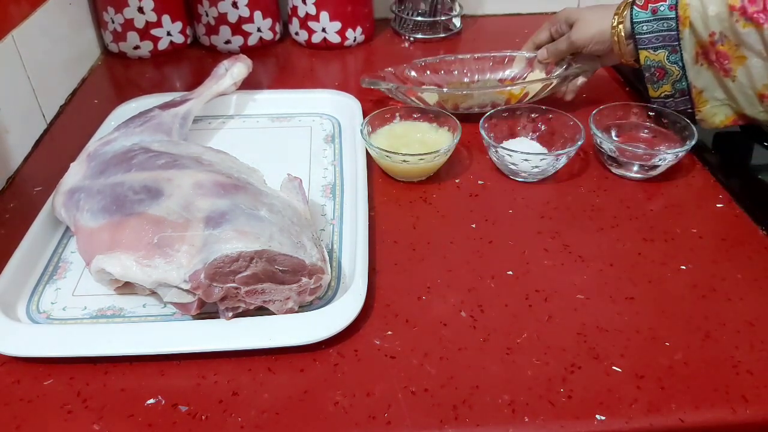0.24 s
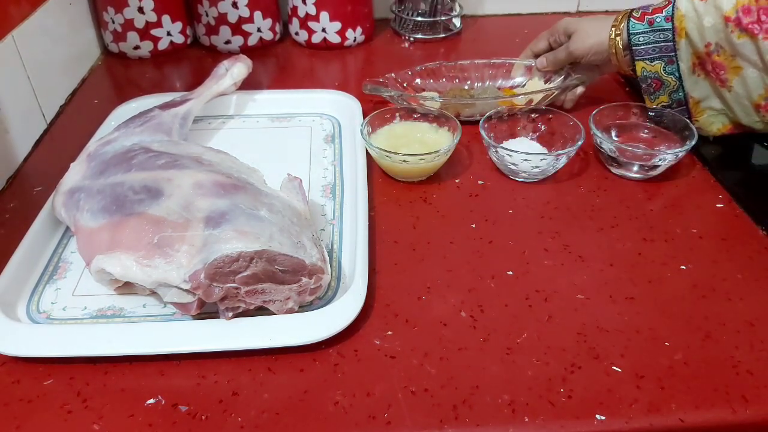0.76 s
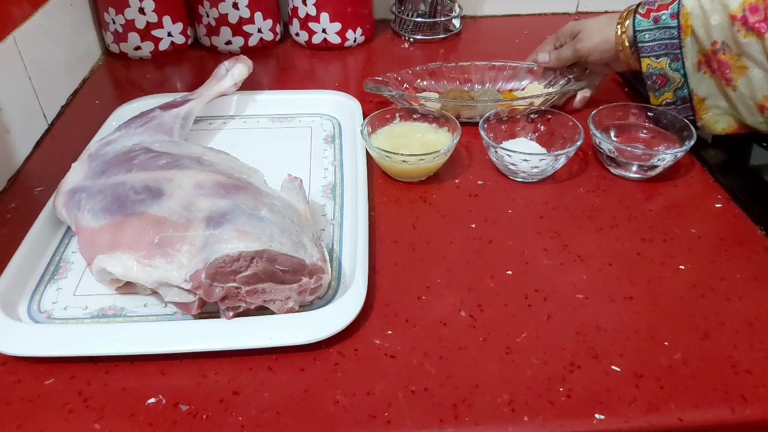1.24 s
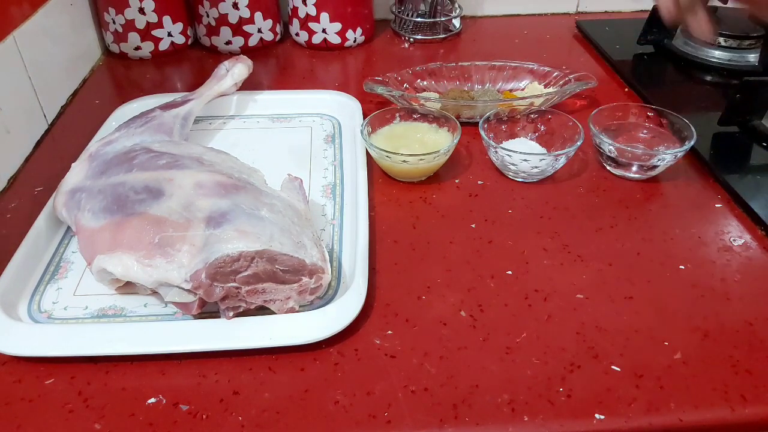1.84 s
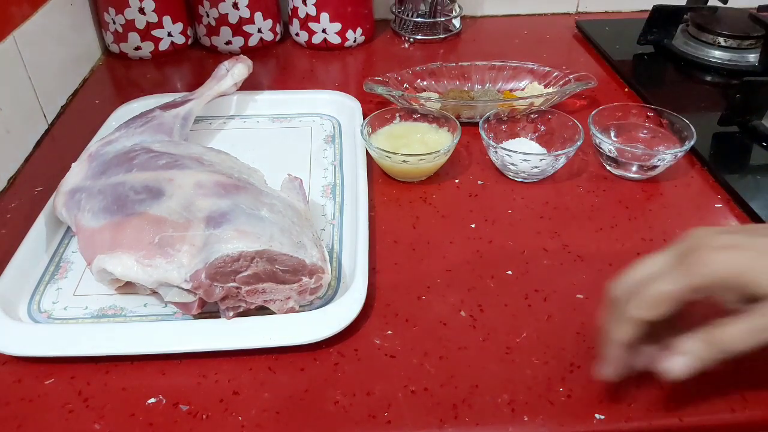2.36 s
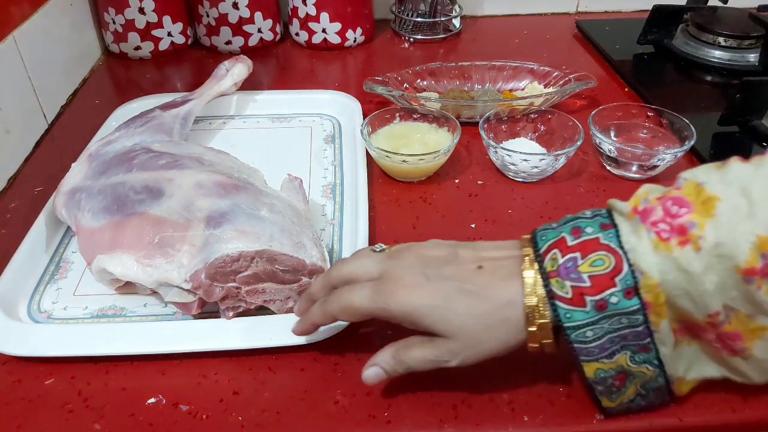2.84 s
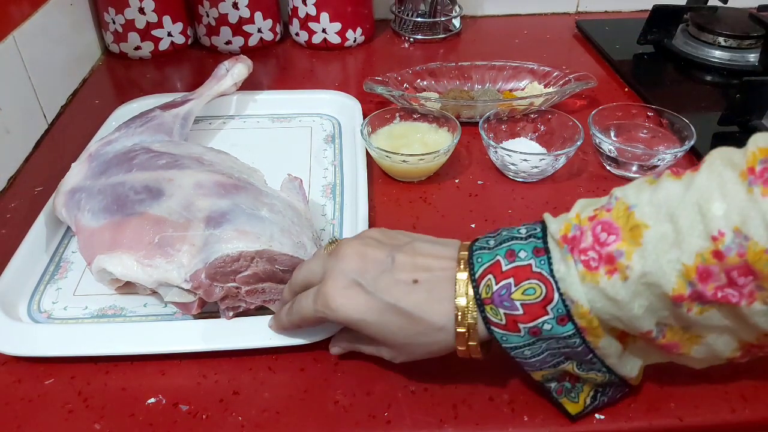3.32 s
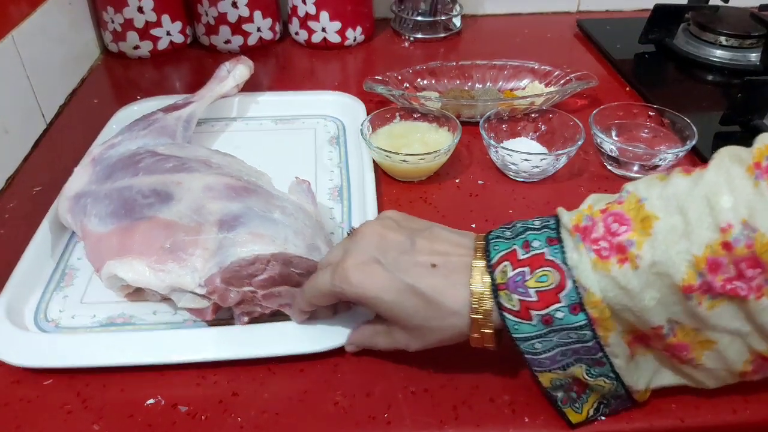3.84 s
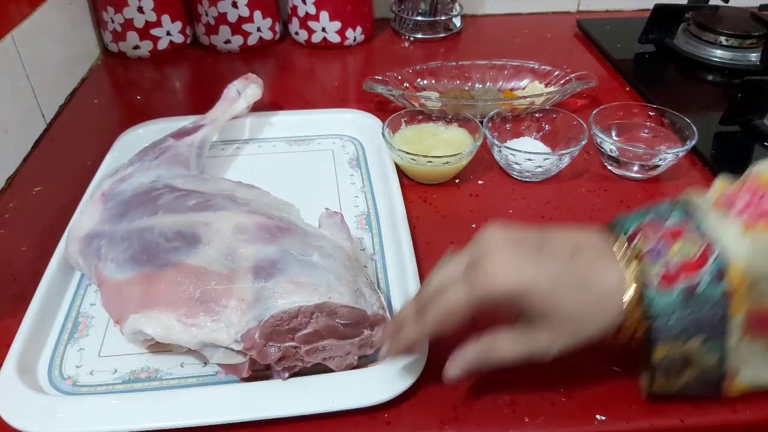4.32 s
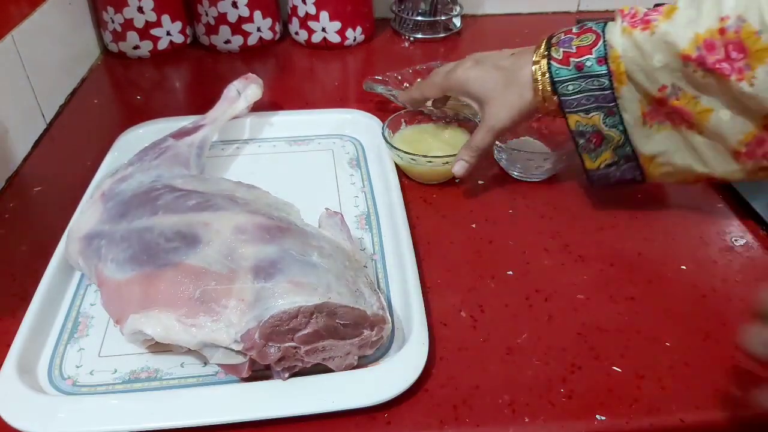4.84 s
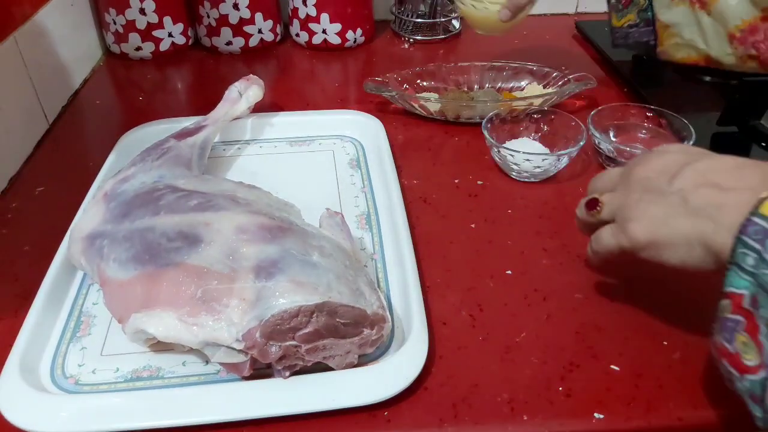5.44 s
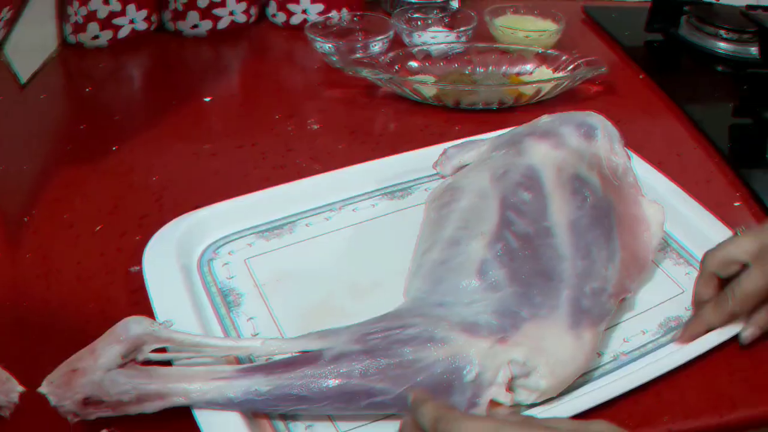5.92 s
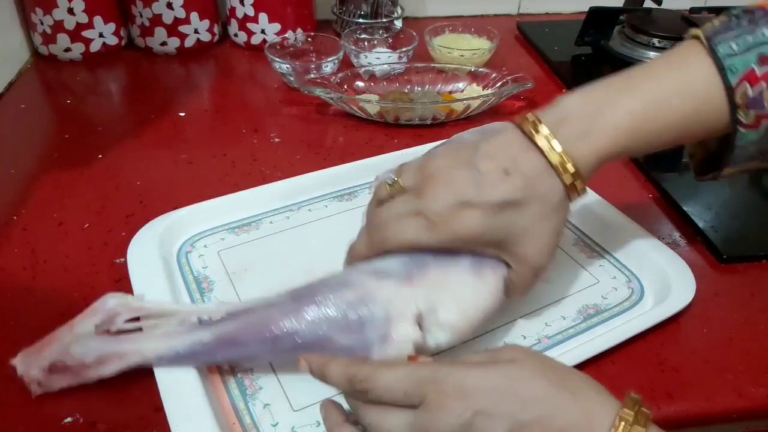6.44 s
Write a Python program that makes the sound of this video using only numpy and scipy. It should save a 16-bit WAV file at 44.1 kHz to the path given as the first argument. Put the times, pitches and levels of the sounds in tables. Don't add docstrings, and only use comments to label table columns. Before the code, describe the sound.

Sharp glass clinks in a tiled kitchen, a pause with low hum, then a clattering tray drag and faint handling of wet meat.

```python
import sys
import numpy as np
from scipy import signal
from scipy.fft import rfft, irfft, next_fast_len
from scipy.io import wavfile
from scipy.ndimage import uniform_filter1d

SR = 44100
rng = np.random.default_rng(int(sys.argv[2]) if len(sys.argv) > 2 else 0)


def store_wav(level_fs):
    pcm = np.round(np.clip(np.atleast_2d(level_fs), -1, 1) * 32767)
    wavfile.write(sys.argv[1], SR, pcm.T.astype(np.int16))


def ratio_of_db(decibels):
    return 10 ** (np.asarray(decibels, float) / 20)


N = 293926

# (frequency [Hz], level [dB], time to fall 60 dB [s])
RIM = [(3100, -18, 0.076), (4380, -25, 0.016), (5300, -28, 0.048), (6620, -21, 0.045), (8400, -50, 0.028)]
# (frequency [Hz], level [dB per Hz])
DISH_CRACK = [(300, -0.5), (1200, 1), (2700, -9.5), (3300, -18.5), (3850, -31.5), (4450, -17.5),
              (6600, -24), (7300, -38), (8500, -25.5), (11000, -29), (13500, -48)]
# (frequency [Hz], level [dB], time to fall 60 dB [s])
TRAY = [(412, -8.5, 0.037), (588, -8, 0.038), (916, -0.5, 0.055), (1010, -4, 0.041), (1130, -1.5, 0.029),
        (1173, -4.5, 0.022), (1550, -2, 0.052), (1940, -15, 0.035), (2170, -8.5, 0.027),
        (2820, -0.5, 0.034), (3350, -6, 0.01), (4100, -17, 0.0089), (4660, -29, 0.02), (5860, -17.5, 0.015)]


def dish_landing():
    # (time [s], peak [dB], strongest pitch [Hz], treble [dB], freedom to ring [factor])
    hits = [(.8411, -14, 1680, 4, 0.26), (.8432, -13.5, 1410, -3.5, 0.77), (.8472, -20, 2000, -8, 0.78),
            (.8625, -21, 1700, 1, 0.46), (.876, -23, 1500, 2, 0.52), (.9636, -28, 1500, 12, 0.2),
            (.9661, -7.5, 1920, -5.5, 0.72), (.9875, -21.5, 900, -4, 0.67), (1.0005, -19.5, 1870, 2, 0.38),
            (1.028, -25, 1400, -6, 0.81), (1.057, -30, 1700, 2.5, 0.43)]
    # (frequency [Hz], level [dB], time to fall 60 dB [s])
    body = [(567, -8, 0.074), (710, -1, 0.037), (903, -3, 0.041), (1054, -1, 0.022), (1324, -0.5, 0.044),
            (1412, 3.5, 0.057), (1640, -4, 0.033), (1733, 1.5, 0.053), (1910, 0, 0.047), (2040, -7, 0.068),
            (2170, -7, 0.03), (2386, 0.5, 0.044), (2600, -11.5, 0.018), (2740, -8.5, 0.023)]
    return blows(hits, np.vstack([body, RIM]), DISH_CRACK, ring_db=-2.5, crack_db=-5.0, thump_db=-14.5,
                 focus_db=3.0, pan_db=3.5, rock_db=-10.5)


def dish_settling():
    # (time [s], peak [dB], strongest pitch [Hz], treble [dB], freedom to ring [factor])
    hits = [
        (1.3705, -26.5, 895, -20, 0.72),
        (1.3935, -21, 1650, 2, 1),
        (1.3975, -17.5, 1440, -4.5, 0.97),
        (1.418, -32, 1610, -8, 0.66),
        (1.452, -30, 1650, -3, 1),
    ]
    # (frequency [Hz], level [dB], time to fall 60 dB [s])
    flat = [(590, -28, .08), (724, 3, 0.037), (1000, -19, 0.032), (1297, -1.5, 0.055), (1360, -3, 0.065),
            (1410, -15, .08), (1537, -4, 0.061), (1590, -3, 0.053), (1710, -5, 0.05), (1945, -8, 0.051),
            (2240, -8.5, .06), (2440, -9, .07)]
    return blows(hits, np.vstack([flat, RIM]), DISH_CRACK, ring_db=-1.1, crack_db=-0.5, thump_db=-18.0,
                 focus_db=12.0, pan_db=-2.5, rock_db=3.0)


def tray_bumps():
    # (time [s], peak [dB], strongest pitch [Hz], treble [dB], freedom to ring [factor])
    hits = [(4.3065, -20.5, 2600, 7, 0.89), (4.3095, -11.5, 1360, 5.5, 0.62),
            (4.3145, -10.5, 1480, -15, 0.68), (4.322, -15.5, 1590, -8.5, 0.59),
            (4.343, -31, 1500, -9, 0.39), (4.349, -27.5, 1150, -6, 0.25), (4.356, -22.5, 1150, -8, .4),
            (4.367, -24, 1000, -8.5, 0.71), (4.386, -19, 990, -5.5, 0.22), (4.414, -23.5, 1010, -8, 0.49),
            (4.436, -21, 830, -4.5, 0.97), (4.4445, -21, 830, -11, 0.45), (4.454, -17, 1100, -11, .4),
            (4.483, -15, 920, -20.5, 0.3), (4.505, -12, 1970, -4.5, 0.42), (4.5125, -14.5, 1840, -8, 0.64),
            (4.518, -15.5, 1547, -4.5, 0.59), (4.604, -27.5, 1790, -12, 0.21),
            (5.453, -46, 1260, -9.5, 0.72), (5.495, -43, 890, -19, 0.71)]
    # (frequency [Hz], level [dB per Hz])
    colour = [(300, 8.5), (1200, -1.5), (2300, -3.5), (3300, -5.5), (4100, -10), (4700, -18), (6200, -14),
              (7000, -27.5), (10000, -22.5), (13500, -28.5)]
    return blows(hits, TRAY, colour, ring_db=-3.0, crack_db=-4.0, thump_db=-25.0,
                 focus_db=28.5, pan_db=-6.0, rock_db=3.5)


def tray_drag():
    # (time [s], level [dB])
    scrape = [(4.17, -72), (4.22, -57), (4.28, -45), (4.36, -40), (4.44, -37), (4.52, -40.5), (4.57, -43.5),
              (4.62, -68), (4.66, -92)]
    # (frequency [Hz], level [dB per Hz])
    rub = [(1470, -10), (2500, -1.5), (3400, -4.5), (3950, -1.5), (4500, 0.5), (5000, -1.5), (6210, -7),
           (7150, -6), (11500, -13), (12700, -18), (13500, -30)]
    grits_per_s, kinds = 500, 6
    span = 4 * SR, 5 * SR
    rattle = np.zeros(SR)
    for _ in range(kinds):
        lands = rng.random(SR) < grits_per_s / kinds / SR
        grit = lands * ratio_of_db(1.6 * np.minimum(rng.exponential(1, SR), 4))
        tick = ring(TRAY, 730, 2.0, focus_db=2.0, free=0.2, split=0.16)
        rattle += signal.oaconvolve(grit, tick)[:SR]
    rattle = np.pad(evened(rattle), (span[0], N - span[1]))
    grains = ratio_of_db(1.1 * evened(uniform_filter1d(rng.standard_normal(N), size=90)))
    scrape_db = curve(scrape)
    rattle_gain = ratio_of_db(0.87 * scrape_db - 5)
    return rattle_gain * rattle + ratio_of_db(scrape_db + 0.5) * grains * noise(rub, 4.0, size=256, span=span)


def bowl_knocks():
    # (time [s], peak [dB], strongest pitch [Hz], treble [dB], freedom to ring [factor])
    hits = [
        (4.4762, -6.5, 2650, 7, 0.39),
        (4.4812, -12, 2520, -0.5, 0.7),
        (4.4915, -12, 2420, 0, 1),
        (4.4995, -25.5, 2490, 19, 0.95),
        (4.5185, -47, 2500, 17, .7),
        (4.5545, -21, 2420, -7.5, 0.79),
        (4.5570, -18, 2420, -5, 0.47),
        (4.5610, -24.5, 2420, -9, 0.35),
    ]
    # (frequency [Hz], level [dB], time to fall 60 dB [s])
    body = [(2430, 9, 0.066), (2690, 11.5, 0.021), (3208, -2.5, 0.017), (4970, 0, 0.024),
            (5500, -0.5, 0.017), (5830, 0, .02), (8000, -9.5, 0.21), (7940, -12, .08), (8457, -11, 0.1),
            (9180, -8, .03), (8730, -11.5, 0.05), (12030, -17, 0.041)]
    # (frequency [Hz], level [dB per Hz])
    colour = [(500, -13), (2500, 7), (4000, -10.5), (5500, -16), (7000, -17), (8500, -22), (10800, -33),
              (12000, -10), (13500, -44)]
    return blows(hits, body, colour, ring_db=-4.5, crack_db=-5.5, thump_db=-26.5,
                 focus_db=12.5, pan_db=-7.0, rock_db=11.5)


def blows(hits, modes, shape, ring_db, crack_db, thump_db, focus_db, pan_db, rock_db):
    # (frequency [Hz], level [dB], time to fall 60 dB [s])
    counter = [(125, 1, 0.027), (175, -9, 0.18), (223, -1.5, 0.25), (305, 1, 0.16), (362.6, -4, 0.21),
               (422, -10.5, 0.1), (488, 0, 0.25)]
    out = np.zeros((2, N))
    for k, (s, db, hz, treble_db, free) in enumerate(hits):
        lean_db = pan_db + rock_db * (-1) ** k
        sides = ratio_of_db(db + np.array([[.5], [-.5]]) * lean_db)
        add(out, s, sides * ratio_of_db(ring_db) * ring(modes, hz, treble_db, focus_db, free))
        add(out, s, sides * ratio_of_db(crack_db) * crack(shape, hz, treble_db, 0.028 * free))
        thump_sides = ratio_of_db(1.2 * db + thump_db + np.array([[-2.5], [2.5]]))
        add(out, s, thump_sides * ring(counter, 300, 0, 0, size=7000))
    return out


def ring(modes, centre_hz, treble_db, focus_db, free=0.72, split=0.011, size=3000):
    hz, db, t60 = np.transpose(np.vstack([modes, modes]))[:, :, None]
    t = np.arange(size) / SR
    db = db + np.where(hz > 3500, treble_db, -focus_db * np.log2(hz / centre_hz) ** 2)
    db = db - 6 * (np.arange(len(hz)) >= len(modes))[:, None]
    detune, sign = rng.uniform(-1, 1, (2,) + hz.shape)
    turns = hz * (1 + split * detune) * t
    dying = ratio_of_db(db - 60 * t / (t60 * free))
    x = (np.sign(sign) * dying * np.sin(2 * np.pi * turns)).sum(0)
    x = x * (1 - np.exp(-t / 0.00035))
    return x / abs(x).max()


def crack(shape, centre_hz, treble_db, t60):
    hz, t = np.fft.rfftfreq(2048, 1 / SR), np.arange(2048) / SR
    focus_db = -2.2 * np.log2(np.clip(hz, 40, 3500) / centre_hz) ** 2
    colour = ratio_of_db(read(shape, hz) + focus_db + treble_db * (hz > 3500))
    x = irfft(rfft(rng.standard_normal((2, len(t)))) * colour)
    x = x * ratio_of_db(-60 * t / t60) * (1 - np.exp(-t / 0.0011))
    x = x + .5 * x[::-1]
    return x / abs(x).max()


def kitchen(x):
    # (frequency [Hz], time to fall 60 dB [s])
    dying = [(150, 0.43), (400, 0.41), (1040, 0.44), (2760, 0.41), (7280, 0.42), (13000, 0.35)]
    first = 160
    taps = np.zeros((2, 30000))
    at = np.arange(first, 29980, 20) + rng.integers(0, 20, (2, 1491))
    np.put_along_axis(taps, at, rng.choice([-1., 1.], at.shape), 1)
    hz, t, z = signal.stft(taps, SR, nperseg=256)
    low = hz < 350
    z[1, low] = 1.22 * z[0, low] + .5 * z[1, low]
    tail = signal.istft(z * ratio_of_db(-60 * t / read(dying, hz)[:, None]), SR, nperseg=256)[1]
    tail = tail * (np.arange(tail.shape[1]) >= first)
    return signal.oaconvolve(x.mean(0)[None], tail / np.linalg.norm(tail[0]), axes=1)[:, :N]


def brushes():
    # (loudest time [s], level [dB], rise [s], fall [s], dull to bright [0 to 1])
    strokes = [
        (.33, -62.5, 0.27, 0.65, 0.15),
        (1.96, -53.5, 0.18, 0.88, 0.065),
        (2.68, -71, 0.061, 0.57, 0.61),
        (3.71, -62, .03, 0.24, 0.11),
        (4.08, -66, 0.28, .3, 0.3),
        (5.371, -64.5, 0.22, 0.44, 1),
        (6.267, -56, 0.0087, 0.075, 0.83),
        (6.37, -61, 0.29, 0.48, 0.91),
        (6.66, -62, 0.13, .1, 0.3),
    ]
    # (frequency [Hz], level [dB per Hz])
    dull_colour = [(300, -1), (600, 13), (1200, -4.5), (2600, -1), (5000, -10), (7000, -9), (13500, -49)]
    # (frequency [Hz], level [dB per Hz])
    bright_colour = [(800, 13), (2000, 4.5), (4200, 4.5), (7000, 4.5), (10000, 1), (12500, -2.5),
                     (13600, -19)]
    # (time [s], peak [dB], frequency [Hz])
    ticks = [
        (6.26, -44, 11100),
        (6.266, -46, 12000),
        (6.2665, -37.5, 4200),
        (6.275, -44, 9940),
        (6.2834, -44, 6400),
    ]
    dull, bright = noise(dull_colour, 2.5, size=512), noise(bright_colour, 1.6, size=256)
    out = np.zeros((2, N))
    for *stroke, share in strokes:
        share = np.clip(share, 0, 1)
        out += ratio_of_db(3.0) * hump(*stroke) * ((1 - share) * dull + share * bright)
    t = np.arange(600) / SR
    for s, db, hz in ticks:
        burst = rng.standard_normal((2, 600)) * 0.99 + np.sin(2 * np.pi * hz * t)
        burst = signal.lfilter([1, -.9], [1], burst)
        add(out, s, ratio_of_db(db - 9.5 - 60 * t / 0.028) * burst)
    return out


def groan():
    # (time [s], level [dB])
    swelling = [(6.53, -66), (6.57, -55), (6.61, -53), (6.635, -55), (6.645, -44), (6.67, -30)]
    # (frequency [Hz], level [dB per Hz])
    colour = [(60, -2), (110, -7), (300, -7), (630, -9), (900, -10), (1500, -25), (2600, -27)]
    # (loudest time [s], level [dB], rise [s], fall [s])
    thuds = [
        (6.61, -48, 0.089, 0.067),
        (6.647, -46, 0.017, .04),
    ]
    tone = np.sin(2 * np.pi * 284 * np.arange(N) / SR) * np.sqrt(2)
    thudding = noise(colour, 2.0, size=512, span=(6 * SR, N))
    return ratio_of_db(curve(swelling) + [[-3], [2.5]]) * tone + sum(hump(*row) for row in thuds) * thudding


def hoots():
    # (time [s], length [s], frequency [Hz], level [dB])
    calls = [
        (1.724, 0.19, 674, -59),
        (1.852, 0.14, 613, -64),
        (2.278, 0.078, 737, -60),
        (3.106, 0.22, 626, -60.5),
        (6.552, 0.093, 630, -63.5),
    ]
    out = np.zeros(N)
    for s, length, hz, db in calls:
        fade = signal.windows.tukey(round(length * SR), .6)
        add(out, s, ratio_of_db(db) * fade * np.sin(2 * np.pi * hz * np.arange(len(fade)) / SR))
    return out * ratio_of_db([[.5], [-1.5]])


def background():
    # (time [s], level [dB])
    swell = [(0.0, -57), (0.42, -55.5), (0.8, -64.5), (1.7, -51), (1.9, -57.5), (2.37, -59.5),
             (3.13, -55.5), (3.4, -52.5), (3.75, -62), (3.99, -52.5), (4.15, -60.5), (4.9, -59), (5.3, -64),
             (5.6, -57.5), (6.03, -59), (6.15, -59.5)]
    # (frequency [Hz], width [Hz], level [dB])
    room = [(274.8, 17.7, 7), (299, 13, -3), (321.4, 18, 5)]
    # (frequency [Hz], level [dB per Hz])
    rumble_colour = [(20, -30.5), (65, -16), (110, -14), (135, -16.5), (236, -11.5), (280, -8), (500, -14),
                     (800, -15.5), (1150, -21.5), (1600, -21), (2000, -22.5), (2600, -23.5), (2750, -85)]
    # (frequency [Hz], width [Hz], level [dB])
    whines = [(158.4, 6.3, 1.5), (208, 8.7, -14), (630, 8, -24), (883.2, 25, 4.5), (1205, 9.8, -6.5),
              (1427, 11, -1.5), (1596, 6, -3.5), (2140, 3.6, -4)]
    # (frequency [Hz], level [dB per Hz])
    hiss = [(2650, -5.5), (3300, -11), (4200, -11.5), (5600, -17), (5950, -18.5), (6250, -1), (7200, 3),
            (8000, -3.5), (8300, -19), (9300, -23), (10000, -22), (10400, -16), (11600, -15.5),
            (12600, -25), (13400, -26.5)]
    boom, swell_db = narrow(room), curve(swell, rest=None)
    boom = ratio_of_db(swell_db + 0.5) * (boom * ratio_of_db([[-9], [1.5]]) + 0.31 * boom[::-1])
    rumble = ratio_of_db(-55 + 0.15 * (swell_db - swell_db.mean())) * noise(rumble_colour, 2.37)
    return boom + rumble + hum() + ratio_of_db(-64) * narrow(whines) + ratio_of_db(-62.5) * noise(hiss, 2.35)


def hum():
    hum_hz, beats_per_s, beat_top_s = 99.64, 2.375, 1.98
    t = np.arange(N) / SR - beat_top_s
    fast = np.cos(2 * np.pi * (hum_hz + beats_per_s / 2) * t)
    slow = np.cos(2 * np.pi * (hum_hz - beats_per_s / 2) * t)
    waver = evened(sum(np.sin(2 * np.pi * (f * t + rng.random())) for f in np.geomspace(3, 9, 12)))
    return ratio_of_db(-66 + 1.2 * waver) * np.sqrt(2) * (fast + ratio_of_db(-4.5) * slow)


def noise(shape, patchy_db, size=1024, span=(0, N)):
    # (frequency [Hz], likeness [-1 to 1])
    likeness = [(60, 0.54), (130, 1), (280, 0.9), (600, -0.19), (1300, -0.13), (2800, 0.039),
                (6040, -0.0044), (13000, -0.11)]
    # (frequency [Hz], level [dB])
    leaning = [(60, -9.5), (130, 0), (280, -10), (600, -1.5), (1300, -3.5), (2800, -2), (6040, -2.5),
               (13000, -2.5)]
    count = span[1] - span[0]
    frames, hz = count * 4 // size + 5, np.fft.rfftfreq(size, 1 / SR)
    a, b, c, d, patches = rng.standard_normal((frames, len(hz), 5)).T
    patches = uniform_filter1d(patches, size=8, axis=0)
    patches = evened(uniform_filter1d(patches, size=12, axis=1))
    same = np.clip(read(likeness, hz), -1, 1)[:, None]
    lean = ratio_of_db(read(leaning, hz) / 2)[:, None]
    left, other = a + 1j * b, c + 1j * d
    right = same * left + np.sqrt(1 - same ** 2) * other
    z = np.array([left * lean, right / lean])
    inside = (hz >= shape[0][0]) & (hz <= shape[-1][0])
    z *= ratio_of_db(read(shape, hz)[:, None] + patchy_db * patches) * inside[:, None]
    x = evened(signal.istft(z, nperseg=size, noverlap=size * 3 // 4)[1][:, :count])
    return np.pad(x, ((0, 0), (span[0], N - span[1])))


def narrow(peaks):
    size = next_fast_len(N)
    hz = np.fft.rfftfreq(size, 1 / SR)
    shape = sum(ratio_of_db(db) / np.sqrt(width) / (1 + (2 * (hz - f) / width) ** 2) for f, width, db in peaks)
    return evened(irfft(rfft(rng.standard_normal((2, size))) * shape, size)[:, :N])


def hump(top_s, db, rise_s, fall_s):
    t = np.arange(N) / SR - top_s
    return ratio_of_db(db - 20 * np.where(t < 0, -t / rise_s, t / fall_s))


def curve(rows, rest=-140.):
    s, db = np.transpose(rows)
    return np.interp(np.arange(N) / SR, s, db, left=rest, right=rest)


def read(points, hz):
    f, value = np.transpose(points)
    return np.interp(np.log(hz + 1), np.log(f + 1), value, left=value[0], right=value[-1])


def evened(x):
    return x / np.sqrt(np.mean(x ** 2) + 1e-20)


def add(mix, s, sound):
    part = mix[..., round(s * SR):][..., :sound.shape[-1]]
    part += sound[..., :part.shape[-1]]


def scene():
    dish, settle, bowl = dish_landing(), dish_settling(), bowl_knocks()
    tray = tray_bumps() + tray_drag()
    before_shift = np.arange(N) < .955 * SR
    echoes = kitchen(dish * before_shift) + kitchen(dish * ~before_shift)
    echoes = echoes + ratio_of_db(-0.8) * kitchen(settle)
    echoes = echoes + ratio_of_db(-1.5) * kitchen(tray) + ratio_of_db(-6.0) * kitchen(bowl)
    struck = dish + settle + tray + bowl + ratio_of_db(-0.5) * echoes
    no_deep_bass = signal.butter(2, 110., "high", fs=SR, output="sos")
    struck = signal.sosfilt(no_deep_bass, struck)
    return struck + brushes() + groan() + hoots() + background()


def low_pass(x):
    return signal.sosfilt(signal.butter(12, 13630, fs=SR, output="sos"), x)


def record(dry):
    # (frequency [Hz], level [dB per Hz])
    faintest = [(2700, -115), (4000, -117), (6000, -118.5), (9000, -119.5), (13000, -121)]
    hz, t, z = signal.stft(dry, SR, nperseg=2048, noverlap=1536, scaling="psd")
    middle = np.minimum(np.arange(len(hz)) // 8 * 8 + 4, len(hz) - 1)
    power = uniform_filter1d(abs(z) ** 2, size=8, axis=1)
    power = uniform_filter1d(power, size=3, axis=2).mean(0)
    band_db = 10 * np.log10(2 * power[middle] + 1e-30)
    strong_hiss = (abs(hz - 7150) < 1250)[:, None]
    dip_db = uniform_filter1d(band_db, size=41, axis=0) - 1.5 - 9 * strong_hiss
    limit_db = np.maximum(read(faintest, hz)[:, None], dip_db)
    keep = 1 / (1 + np.exp(np.clip((limit_db - band_db) / .2, -30, 6)))
    keep = np.where(hz[:, None] < 2600, 1, keep) * (hz[:, None] < 13200)
    kept = signal.istft(z * keep, SR, nperseg=2048, noverlap=1536, scaling="psd")[1][:, :N]
    return low_pass(kept)


dry = scene()
out = record(dry)
store_wav(out)
```